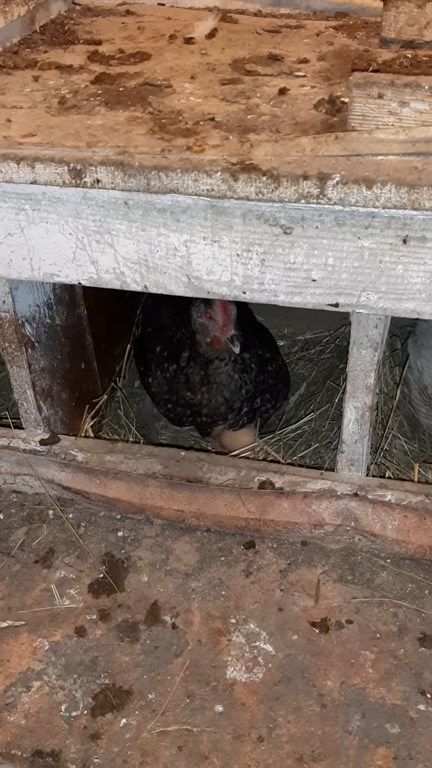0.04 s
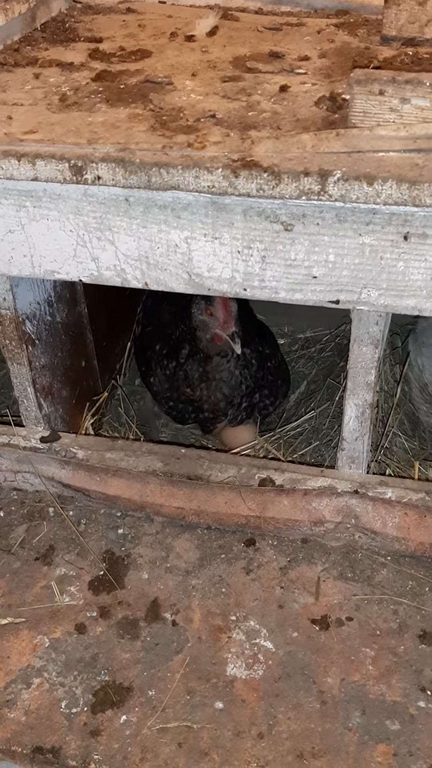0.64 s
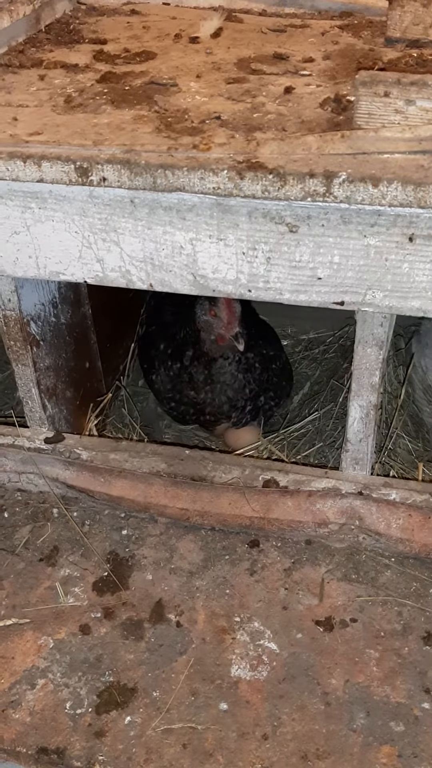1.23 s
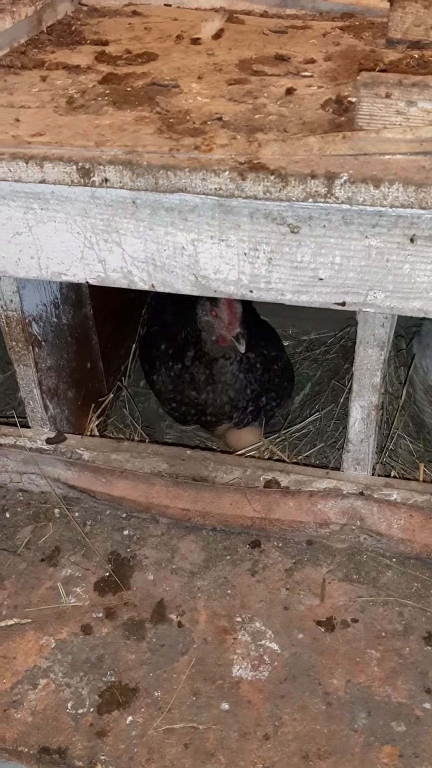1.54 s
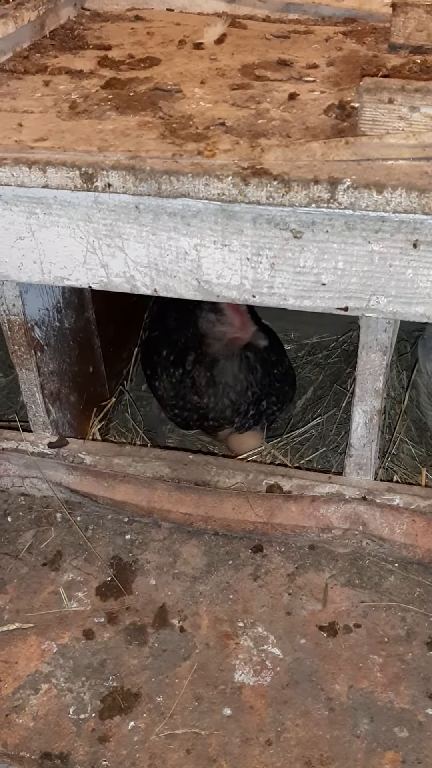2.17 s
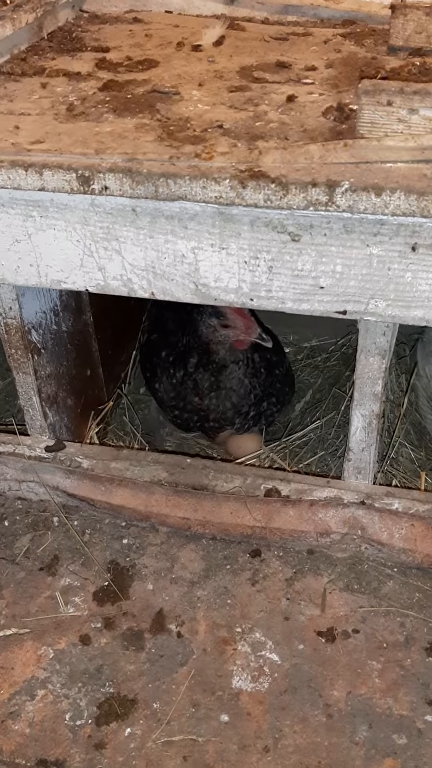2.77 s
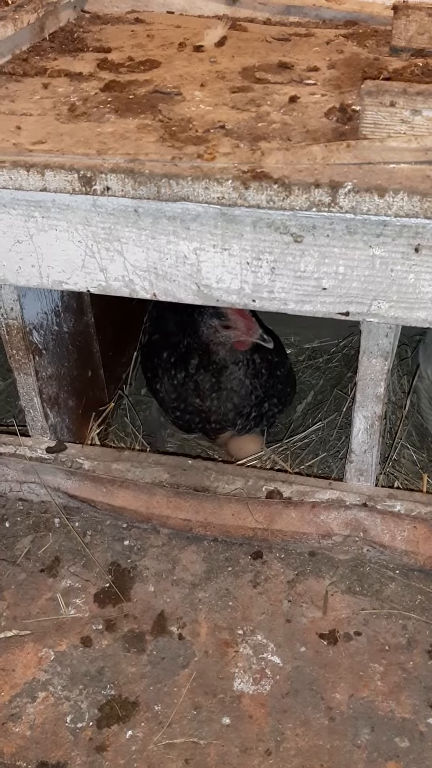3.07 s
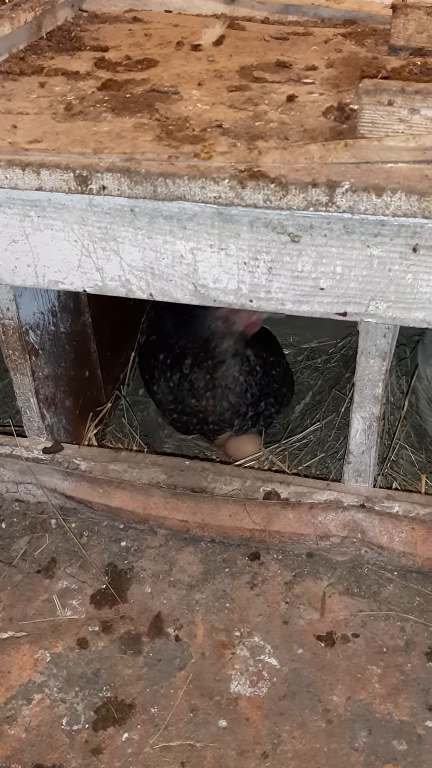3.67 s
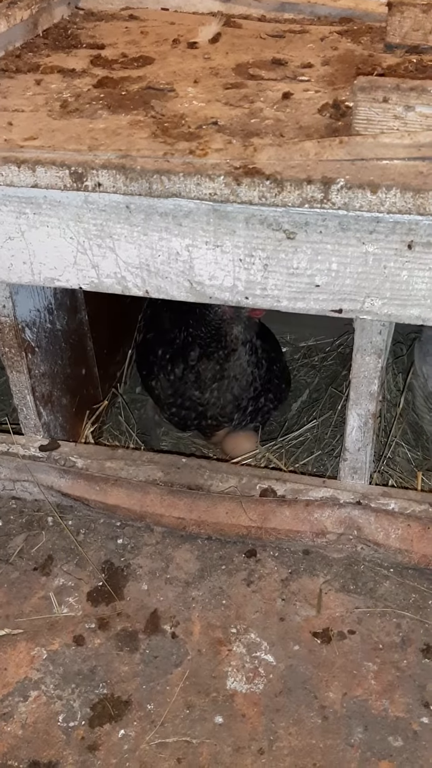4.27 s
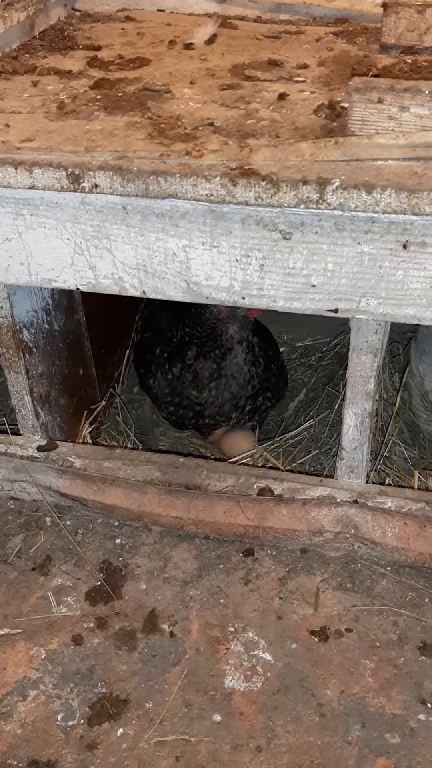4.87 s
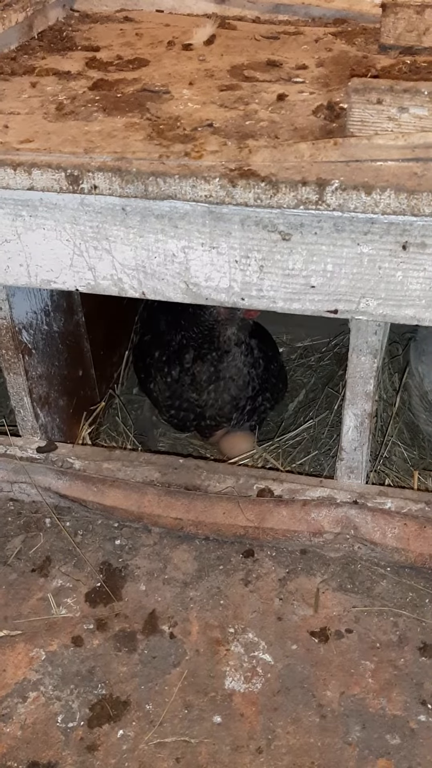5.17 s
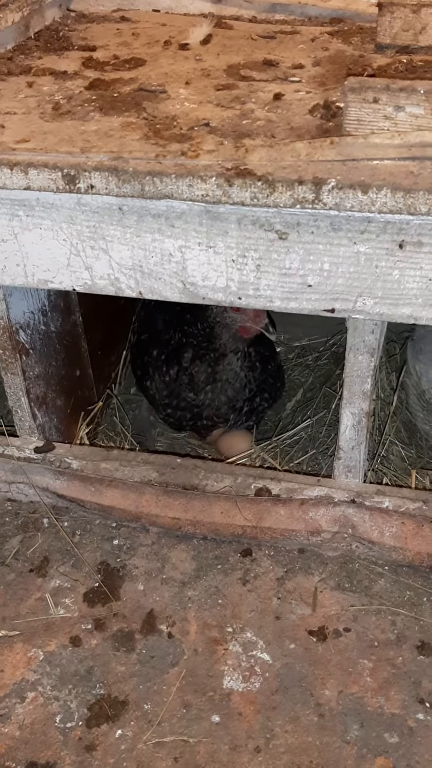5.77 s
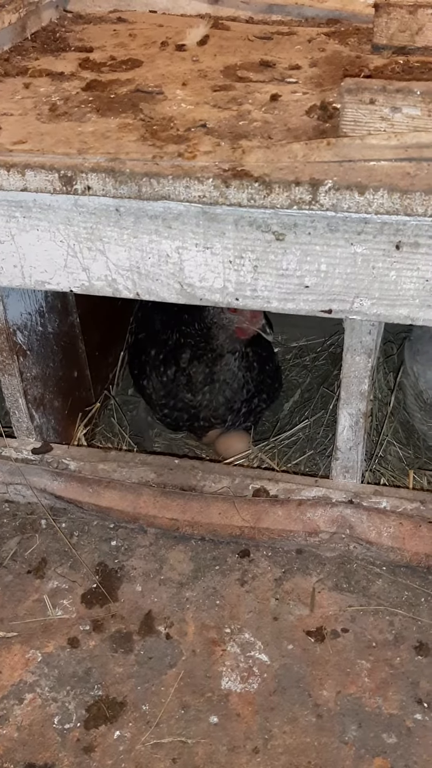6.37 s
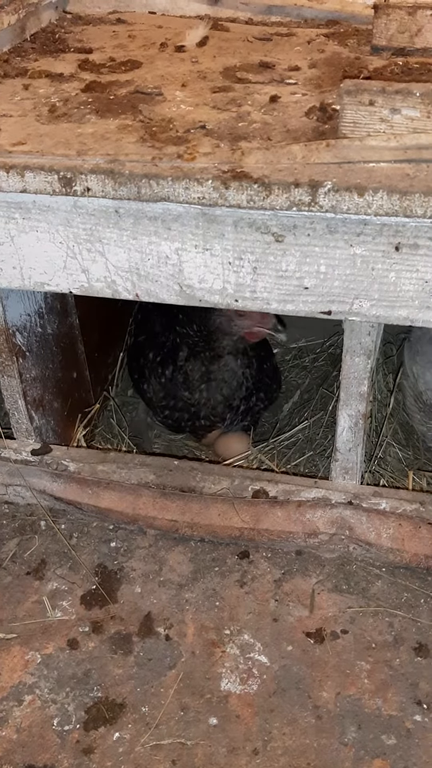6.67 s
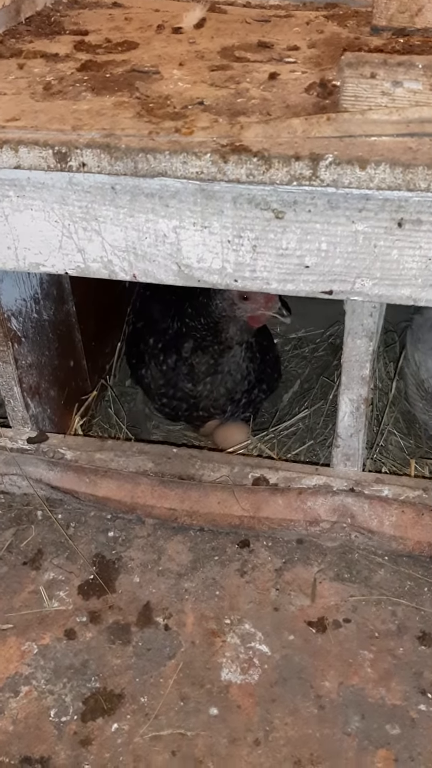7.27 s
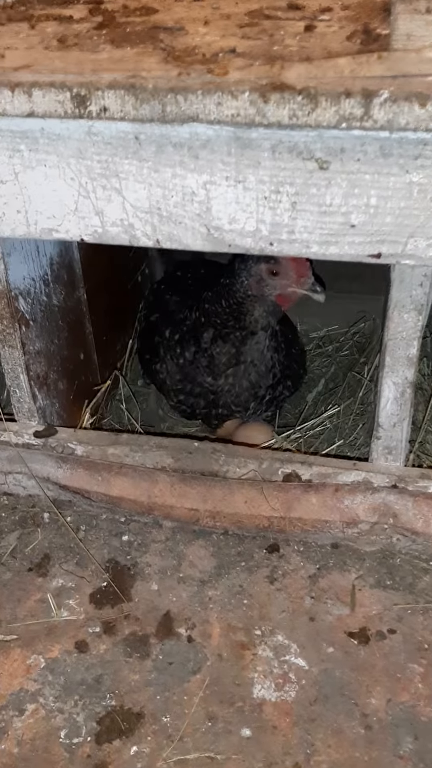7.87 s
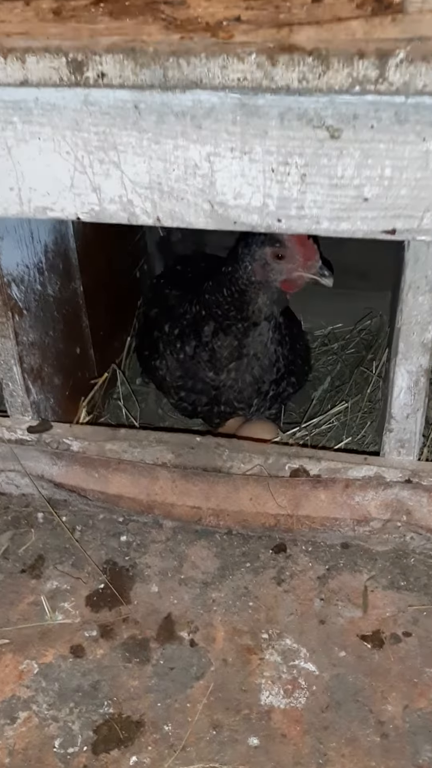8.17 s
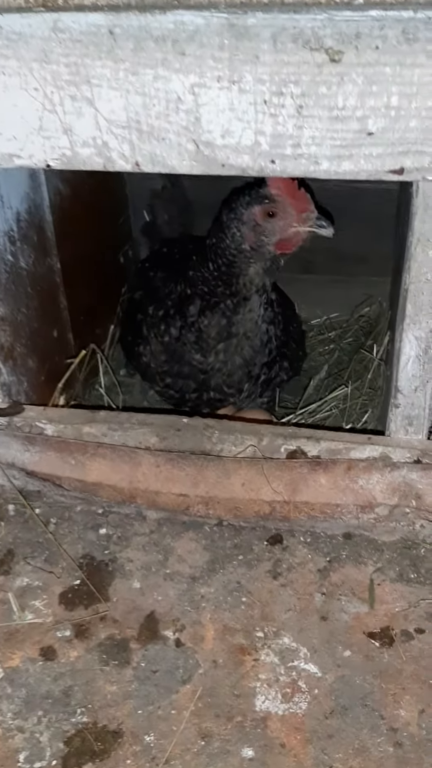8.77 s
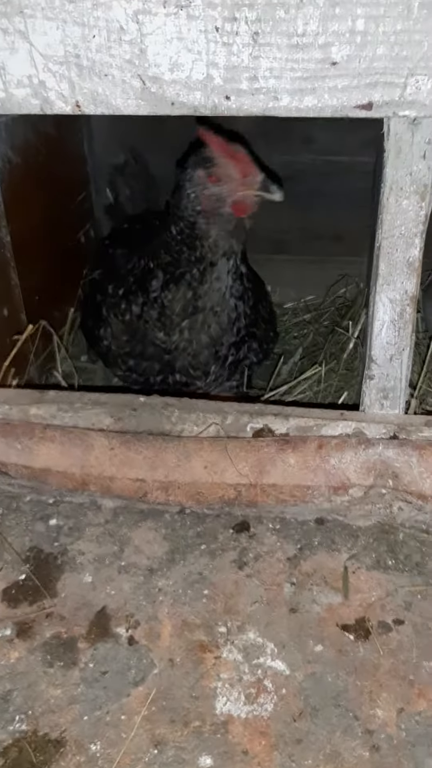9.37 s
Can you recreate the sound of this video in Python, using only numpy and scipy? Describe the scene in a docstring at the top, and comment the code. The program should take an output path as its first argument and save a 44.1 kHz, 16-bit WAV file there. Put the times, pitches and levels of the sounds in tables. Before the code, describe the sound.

A hen cackles close by in a wooden nest box for about nine and a half seconds. From the start she gives short, low, creaky clucks, three or four a second. Six times the run breaks into a louder, longer squawk, at about 0.6, 2.3, 3.7, 5.1, 6.6 and 8.9 seconds. Each squawk opens with a harsh rasp, holds a tone, then falls away roughly, and the clucking resumes after a short gap. The boards add a boxy colour and a very brief ring. Far off, another hen whines very faintly from 1 to 1.5 seconds, and the flock gives a few barely audible murmurs between 3 and 7 seconds. From about 7.3 seconds a faint hiss swells, peaking near 8.4 and fading. After 8 seconds the hen sounds closer and brighter, ending on one short cluck.

```python
"""A hen cackles on her egg in a wooden nest box: runs of short clucks, six breaking into a long squawk.
Her syrinx sends pulses and puffs of air through throat and beak. Each note starts as a creak, clears
into a tone and ends in a falling rasp; the boards throw it back at once and the coop rings briefly.
Far off, another hen whines and the flock murmurs. Near the end a soft hiss swells and she sounds closer."""
import sys
import numpy as np
from scipy import signal
from scipy.fft import rfft, irfft, next_fast_len
from scipy.io import wavfile
from scipy.ndimage import uniform_filter1d, minimum_filter1d

SR = 44100
rng = np.random.default_rng(int(sys.argv[2]) if len(sys.argv) > 2 else 0)


def wav_out(sig):
    """Save sig, one row per channel (or a flat mono array), as 16-bit PCM at SR to the path in sys.argv[1]."""
    wavfile.write(sys.argv[1], SR, np.round(np.clip(np.atleast_2d(sig).T, -1, 1) * 32767).astype(np.int16))


N = 414981

# (start [s], creak [s], length [s], pitch [Hz], tone roughness [0-1], level [dB], treble offset [dB])
CLUCK_NOTES = [(0.164, 0.035, 0.11, 254.7, 0.2, -21.5, -12), (0.443, 0.03, 0.13, 260.3, 0.11, -20.5, -13.5),
               (1.038, 0.034, 0.063, 251.2, 0.38, -21.5, -13.5), (1.313, 0.038, 0.063, 244, 0.36, -20, -12),
               (1.576, 0.039, .092, 254.5, 0.37, -21.5, -13.5), (1.853, 0.034, 0.15, 254, 0.23, -21.5, -12),
               (2.16, 0.033, 0.12, 257.6, 0.17, -17.5, -11.5),
               (2.775, 0.023, 0.067, 258.3, 0.35, -22.5, -14),
               (3.055, 0.029, 0.055, 247.3, 0.2, -21.5, -17.5),
               (3.316, 0.045, 0.082, 252, 0.34, -22.5, -11.5),
               (3.588, 0.035, 0.14, 257, 0.15, -22.5, -12.5),
               (4.167, 0.023, 0.069, 256.6, 0.33, -23.5, -16.5),
               (4.448, 0.033, 0.064, 237, 0.33, -24.5, -14), (4.72, .036, 0.081, 243, 0.2, -23, -16),
               (4.99, 0.033, 0.16, 250.7, 0.1, -23.5, -13), (5.661, 0.034, .064, 252.9, 0.31, -20, -13),
               (5.928, 0.042, .077, 244.7, 0.24, -21.5, -12), (6.202, 0.039, 0.085, 246.4, 0.38, -22, -13),
               (6.471, 0.038, 0.13, 252.4, 0.17, -22, -11.5),
               (7.065, 0.025, 0.068, 254.8, 0.34, -21.5, -14.5),
               (7.348, 0.035, 0.068, 240.8, 0.29, -22, -14.5),
               (7.628, 0.04, 0.07, 239.6, 0.41, -22.5, -13.5),
               (7.892, 0.041, 0.08, 246.8, 0.41, -22, -12.5),
               (8.162, 0.037, 0.086, 244.3, 0.42, -19, -12.5), (8.428, 0.042, 0.12, 256, 0.16, -16.5, -12),
               (8.719, 0.047, 0.13, 250.9, 0.18, -18, -12), (9.328, 0.037, 0.061, 260.2, 0.25, -22, -9)]
# (start [s], rasp [s], tone [s], collapse [s], pitch [Hz], tone roughness [0-1], level [dB],
#  treble offset [dB])
SQUAWK_NOTES = [(0.573, 0.087, 0.11, .048, 307.6, 0.2, -13, -18.5),
                (2.29, 0.13, 0.099, 0.06, 306, 0.22, -13.5, -18),
                (3.737, 0.15, .057, 0.047, 305.4, 0.4, -13.5, -20),
                (5.14, 0.13, .11, 0.044, 306.5, 0.16, -14.5, -18.5),
                (6.611, .085, 0.13, .05, 305.3, 0, -13.5, -19),
                (8.857, 0.12, 0.12, 0.059, 306.1, 0.1, -15, -13.5)]
# throat response, beak nearly shut / wide open: (frequency [Hz], gain [dB])
THROAT_SHUT_DB = [(50, -35.5), (150, -0.5), (260, -2.5), (450, 1), (680, 7), (1080, 21), (1550, 3),
                  (2050, 0), (2650, -8), (3800, 11.5), (4600, -12), (5700, -14.5), (7800, -13),
                  (8700, -30.5), (15500, -20.5)]
THROAT_OPEN_DB = [(50, -25.5), (290, -11), (650, -0.5), (940, 19), (1200, 19), (1500, -1), (2100, 8),
                  (2650, -6.5), (3600, -4), (4500, -15.5), (5300, -20), (7800, -23.5), (8700, -40),
                  (15500, -29.5)]
# beak resonances: (frequency [Hz], width [Hz], gain [dB])
BEAK_MODES = [(2050, 220, -4.5), (5040, 630, 2)]
# brighter beak, head raised to the opening: (frequency [Hz], gain [dB])
HEAD_RAISED_DB = [(200, -5), (600, 1), (850, 1.5), (1100, 3), (1650, -1), (2200, -3.5), (2600, 3.5),
                  (3150, -2.5), (3420, 6.5), (3800, 1.5), (5000, -2.5), (8000, 1.5)]
# direct sound and board echoes, normal / close: (left delay [ms], left gain, right delay [ms], right gain)
BOX_PATHS = [(0.0, 0.6, 0.13, 1.42), (0.273, 0.19, 0.259, -0.25), (0.916, 0.068, 0.698, 0.61),
             (1.6, -0.17, 1.333, -0.48), (3.425, 0.058, 1.492, 0.1), (3.999, 0.17, 2.607, 0.54),
             (4.217, -0.054, 4.088, 0.066), (5.25, 0.078, 5.274, -0.084), (7.456, 0.64, 6.614, 0.22)]
CLOSE_PATHS = [(0, 0.67, .097, 0.6), (0.359, 0.18, .615, 0.96), (0.758, 0.28, .86, -0.51),
               (1.264, -.07, 3.9, .28), (3.966, 0.33, 4.526, 0.28)]
# balance as she turns her head: (time [s], left minus right [dB])
BALANCE_DB = [(0, 2.34), (4.2, 0.6), (5, 1.8), (8, 2.8), (8.15, 0), (9.4, 0.6)]
# coop decay: (frequency [Hz], T60 [s])
COOP_T60_S = [(150, .15), (400, .115), (1100, .135), (3000, .12), (8000, .115), (15000, .1)]
# far hen: (time [s], pitch [Hz], level [dB])
FAR_WHINE = [(.97, 480, -65.5), (1.02, 490, -73), (1.13, 600, -62), (1.19, 635, -57.5), (1.235, 645, -68.5),
             (1.25, 745, -54.5), (1.33, 765, -55.5), (1.44, 745, -49), (1.49, 715, -59.5), (1.55, 690, -61)]
# flock: (start [s], length [s], pitch [Hz], mid-call level [dB])
FLOCK_MURMURS = [(2.903, 0.082, 366, -70), (2.95, 0.077, 1110, -87), (3.18, 0.074, 405, -72.5),
                 (4.326, 0.082, 400, -69.5), (5.501, 0.069, 327, -70.5), (5.83, 0.072, 522, -81.5),
                 (6.121, 0.074, 1070, -70.5), (7.242, .1, 1110, -73.5)]
# hiss spectrum: (frequency [Hz], gain [dB])
HISS_SHAPE_DB = [(40, -14), (300, -5.5), (1500, -10), (2500, -11.5), (5400, -17.5), (7500, -22),
                 (9000, -31), (12000, -15.5), (16000, -28)]
# hiss envelope: (time [s], level [dB])
HISS_SWELL_DB = [(0, -85.5), (7.1, -86), (7.3, -78.5), (7.55, -70), (7.8, -72), (8.08, -66.5), (8.35, -58),
                 (8.62, -61), (8.72, -66), (9.2, -79.5), (9.41, -102)]


def cluck(start_s, creak_s, length_s, hz, tone_rough, level_db, treble_db, release_s=.021):
    """A pop and a creak clear into a low tone, which sags as the pulses double."""
    end_s, clear_s, pop_s = start_s + length_s, start_s + creak_s, start_s + .013
    open_s = max(clear_s - .012, pop_s)
    break_s = max(start_s + .7 * length_s, clear_s)
    t = np.arange(start_s, end_s + release_s, 1 / SR)
    scoop = .08 * np.exp((start_s - t) / .014)
    sag = .13 * (1 + np.tanh((t - break_s - .013) / .01)) / 2
    rough = np.interp(t, [clear_s - .015, clear_s, break_s, break_s + .03],
                      [1, tone_rough, tone_rough, .45])
    twin = np.interp(t, [start_s, clear_s, break_s + .003, break_s + .02], [.35, .05, .05, .8])
    drive = syrinx(t, hz * (1 - scoop - sag), rough, twin, limp=.083 * rough, wobble=.14)
    body_db = level_db + effort_db(t, [start_s, pop_s, open_s, clear_s, break_s, end_s],
                                   [-22.5, -6.5, -6.5, 0, 0, -4.5])
    body_db -= 169.5 * np.maximum(t - start_s - .15, 0)  # a long cluck runs out of air
    # open beak: more treble, less bass
    bright_db = treble_db + np.interp(t, [start_s, clear_s, break_s, end_s], [-4.5, 0, 0, -10.5])
    bass_db = np.interp(t, [open_s, clear_s, break_s, end_s], [0, -8.5, -8.5, 0])
    bass = signal.sosfiltfilt(signal.butter(3, 664, fs=SR, output="sos"), drive)
    drive += (amp(bass_db) - 1) * bass
    return voice(t, drive, THROAT_SHUT_DB, body_db, bright_db, release_s)


def squawk(start_s, rasp_s, tone_s, collapse_s, hz, tone_rough, level_db, treble_db, release_s=.01):
    """The voice leaps up in a harsh doubled rasp, holds a tone, then flares and collapses."""
    clear_s, break_s, end_s = start_s + np.cumsum([rasp_s, tone_s, collapse_s])
    surge_s, flare_s = start_s + .03, break_s + .015
    t = np.arange(start_s, end_s + release_s, 1 / SR)
    leap = .15 * np.exp((start_s - t) / .03)
    lurch = np.interp(t, [clear_s - .02, clear_s], [.036, 0]) * (drift(t, rate_hz=142.7) - 1)
    creep = .1 * (t - clear_s)
    fall = 5.4 * np.maximum(t - break_s, 0)
    pitch_hz = hz * (1 - leap + lurch + creep - fall)
    rough = np.interp(t, [clear_s - .025, clear_s, break_s, flare_s, end_s],
                      [.8, tone_rough, tone_rough, .7, .85])
    twin = np.interp(t, [clear_s - .04, clear_s, break_s, break_s + .012], [.8, .05, .03, .7])
    drive = syrinx(t, pitch_hz, rough, twin, limp=.025 + .14 * rough, wobble=.05)
    body_db = level_db + effort_db(t, [start_s, surge_s, clear_s, break_s, flare_s, end_s],
                                   [-11.5, 6, 0, -2.5, 3, -12.5])
    # treble bites, then dulls as the beak closes
    bright_db = treble_db + np.interp(t, [start_s, surge_s, break_s, end_s], [10.5, 0, 0, -2])
    call = voice(t, drive, THROAT_OPEN_DB, body_db, bright_db, release_s)
    return pan(call, left_db=.44)  # neck stretched to the left


def effort_db(t, stages_s, levels_db, decay_db_per_s=547.5):
    """Vocal effort through the stages of a call, dying away after the last."""
    return np.interp(t, stages_s, levels_db) - decay_db_per_s * np.maximum(t - stages_s[-1], 0)


def syrinx(t, hz, rough, twin, limp, wobble, shimmer=.95, rasp_hz=4200):
    """One pulse a cycle, with a twin halfway under strain; roughness upsets timing and size."""
    wavering_hz = hz * (1 + wobble * (rough ** 1.15 + .01) * drift(t, rate_hz=350))
    half_cycles = np.cumsum(2 * wavering_hz) / SR
    k = np.arange(1, int(half_cycles[-1]))
    due_samples = np.interp(k, half_cycles, np.arange(len(t)))
    i = due_samples.astype(int)
    time_noise, size_noise = rng.standard_normal((1024, 2))[:len(k)].T
    jitter_s = 5e-5 * rough[i] * time_noise
    strength = np.where(k % 2, 1, twin[i]) * (1 + np.clip(shimmer * rough[i] * size_noise, -.6, .6))
    strength *= 1 + limp[i] * np.sin(np.pi * k / 2)  # alternate cycles weaker: growl an octave down
    taps = i[:, None] + np.arange(-16, 17)
    offset = taps - (due_samples + SR * jitter_s)[:, None]
    shapes = np.sinc(offset) * np.exp(-(offset / 10) ** 2)
    pulses = np.zeros(len(t))
    np.add.at(pulses, np.clip(taps, 0, len(t) - 1), strength[:, None] * shapes)
    # air rushes through the open membranes each cycle
    airflow = np.exp(-(half_cycles / 2 % 1) / .82)
    puffs = unit_rms(airflow * rng.standard_normal(SR)[:len(t)])
    rasp = signal.sosfilt(signal.butter(2, rasp_hz, "high", fs=SR, output="sos"), puffs)
    return unit_rms(pulses) + amp(-12) * (rough + .25) * puffs + amp(-4) * (rough + .12) * rasp


def voice(t, drive, throat, body_db, bright_db, release_s,
          split_hz=2600, treble_lift_db=1, attack_s=.006, close_from_s=8.1):
    """Throat, beak and box colour the pulses; body and treble each follow their own level curve."""
    x = beak(colour(drive, throat))
    if t[0] < close_from_s:
        x = nest_box(x, BOX_PATHS)
    else:
        x = nest_box(colour(x, HEAD_RAISED_DB), CLOSE_PATHS)
    out = 0
    for kind, level_db in (("low", body_db), ("high", body_db + bright_db + treble_lift_db)):
        band = signal.sosfilt(signal.butter(6, split_hz, kind, fs=SR, output="sos"), x)
        power = uniform_filter1d(uniform_filter1d(band.mean(0) ** 2, size=400), size=260)
        out += band * amp(level_db) / np.sqrt(abs(power) + 1e-12)
    return out * np.clip((t[-1] - t) / release_s, 0, 1) * np.clip((t - t[0]) / attack_s, 0, 1)


def beak(x):
    """Narrow beak resonances ring on top of the throat."""
    return x + sum(amp(db) * signal.lfilter(*signal.iirpeak(hz, hz / width_hz, fs=SR), x)
                   for hz, width_hz, db in BEAK_MODES)


def nest_box(x, paths):
    """Direct sound plus echoes off the nearest boards, in stereo."""
    size = next_fast_len(2 * len(x))
    phase_per_ms = -2j * np.pi * np.fft.rfftfreq(size, 1000 / SR)
    boards = sum(np.array([left * np.exp(phase_per_ms * left_ms), right * np.exp(phase_per_ms * right_ms)])
                 for left_ms, left, right_ms, right in paths)
    return irfft(rfft(x, size) * boards, size)[:, :len(x)]


def coop(x, gap_s=.0005):
    """Short, dense ring of the wooden coop; straw and rough boards scatter the treble most."""
    hz, t, noise = signal.stft(rng.standard_normal((2, SR // 2)), SR, nperseg=256)
    decay_db = -60 * t / at_hz(COOP_T60_S, hz)[:, None]
    tail = signal.istft(noise * amp(decay_db), SR, nperseg=256)[1]
    tail *= np.clip(np.arange(tail.shape[1]) / SR / gap_s - 1, 0, 1)
    tail = np.array([colour(side / np.linalg.norm(side), [(2200, .0023), (4500, 10)]) for side in tail])
    return signal.fftconvolve(x, tail, axes=1)[:, :N]


def far_hen(t, hz, level_db, waver=.013, rolloff_db=11):
    """A distant call: a wavering tone with weak overtones."""
    cycles = np.cumsum(hz * (1 + waver * drift(t, rate_hz=160))) / SR
    tone = sum(amp(-rolloff_db * k) * np.sin(2 * np.pi * k * cycles) for k in range(1, 5))
    return amp(level_db) * unit_rms(tone) * signal.windows.tukey(len(t), .2)


def flock():
    """One far whine and a few murmurs, centred."""
    out = np.zeros(N)
    t = np.arange(FAR_WHINE[0][0], FAR_WHINE[-1][0], 1 / SR)
    add(out, t[0], far_hen(t, *at_time(FAR_WHINE, t)))
    for start_s, length_s, hz, level_db in FLOCK_MURMURS:
        t = np.arange(start_s, start_s + length_s, 1 / SR)
        arch = np.sin(np.pi * (t - start_s) / length_s)
        add(out, start_s, arch * far_hen(t, hz, level_db, waver=.1, rolloff_db=25))
    return np.array([out, out])


def hiss(shared_weight=.55):
    """Soft hiss, partly common to both sides."""
    shared, left, right = (unit_rms(colour(z, HISS_SHAPE_DB)) for z in rng.standard_normal((3, N)))
    air = shared_weight * shared + (1 - shared_weight) * np.array([left, right])
    return unit_rms(air) * amp(at_time(HISS_SWELL_DB, np.arange(N) / SR)[0])


def colour(x, spectrum_db, size=2048):
    """Minimum-phase filter: resonances ring after each pulse."""
    log_gain = np.log(amp(at_hz(spectrum_db, abs(np.fft.fftfreq(size, 1 / SR)))))
    ring = np.fft.ifft(np.exp(np.conj(signal.hilbert(log_gain)))).real
    return signal.oaconvolve(x, ring[:size // 2])[:len(x)]


def drift(t, rate_hz):
    """Random values joined by ramps."""
    values = rng.standard_normal(2048)
    return np.interp((t - t[0]) * rate_hz, np.arange(len(values)), values)


def at_hz(rows, hz):
    """Table value on a log-frequency axis."""
    knots_hz, values = np.transpose(rows)
    return np.interp(np.log(hz + 1), np.log(knots_hz), values)


def at_time(rows, t):
    """Table columns at times t."""
    knots_s, *columns = np.transpose(rows)
    return [np.interp(t, knots_s, column) for column in columns]


def amp(db):
    """Decibels to gain."""
    return 10 ** (np.asarray(db) / 20)


def unit_rms(x):
    """Scales to rms 1."""
    return x / np.sqrt(np.mean(x ** 2) + 1e-20)


def pan(x, left_db):
    """Tips the stereo balance."""
    return np.array([x[0] * amp(left_db / 2), x[1] * amp(-left_db / 2)])


def add(mix, start_s, sound):
    """Mixes a sound in place."""
    part = mix[..., round(start_s * SR):][..., :sound.shape[-1]]
    part += sound[..., :part.shape[-1]]


def scene(coop_db=-14):
    """Hen and flock in the coop, over the hiss."""
    hen = np.zeros((2, N))
    for note in CLUCK_NOTES:
        add(hen, note[0], cluck(*note))
    for note in SQUAWK_NOTES:
        add(hen, note[0], squawk(*note))
    birds = pan(hen, *at_time(BALANCE_DB, np.arange(N) / SR)) + flock()
    return birds + amp(coop_db) * coop(birds) + hiss()


def record(dry, ceiling=.86, cutoff_hz=16000):
    """Fast peak limiter, then low-pass."""
    needed_gain = np.minimum(1, ceiling / (abs(dry).max(0) + 1e-9))
    gain = uniform_filter1d(minimum_filter1d(needed_gain, size=301), size=301)
    lowpass = signal.firwin(511, cutoff_hz, window=("kaiser", 9), fs=SR)
    return signal.oaconvolve(dry * gain, lowpass[None], "same")


dry = scene()
out = record(dry)
wav_out(out)
```